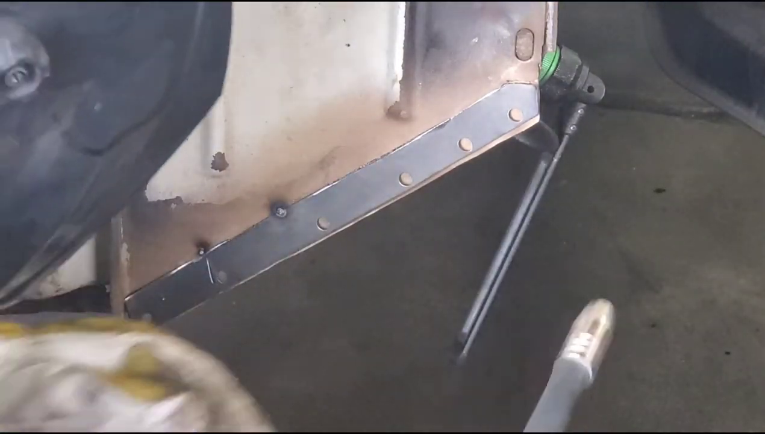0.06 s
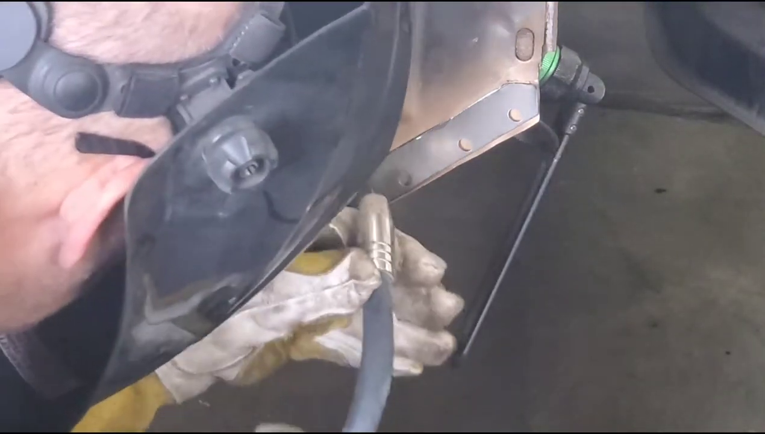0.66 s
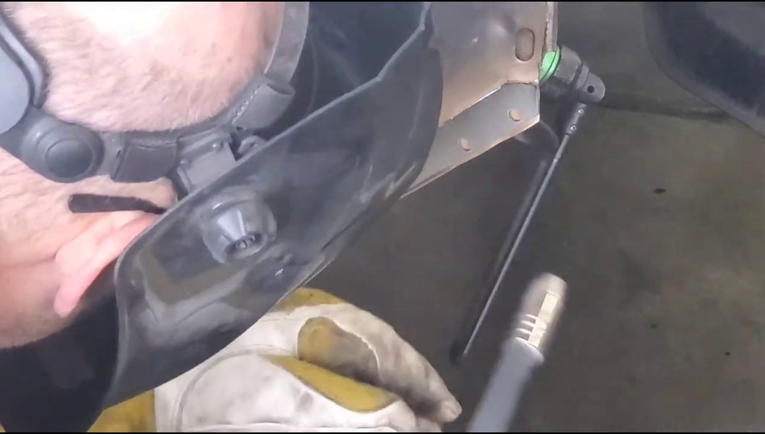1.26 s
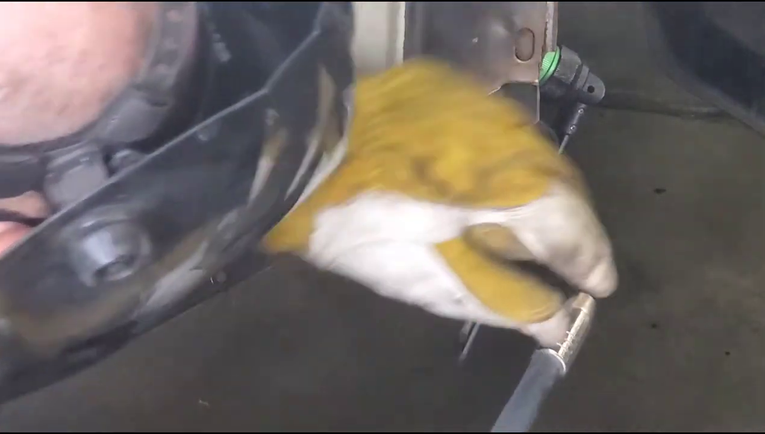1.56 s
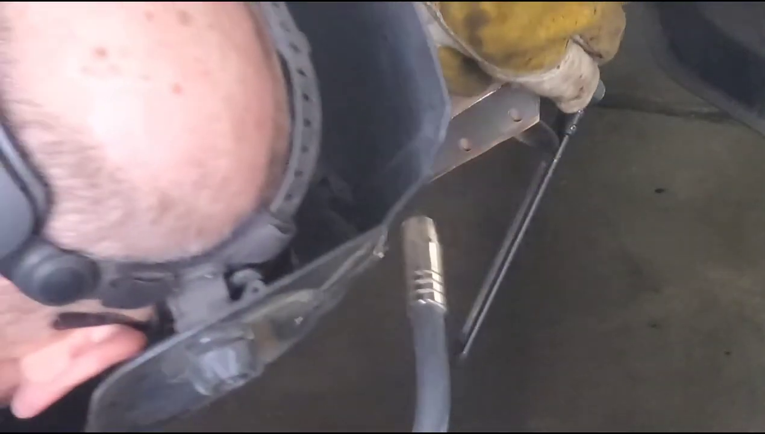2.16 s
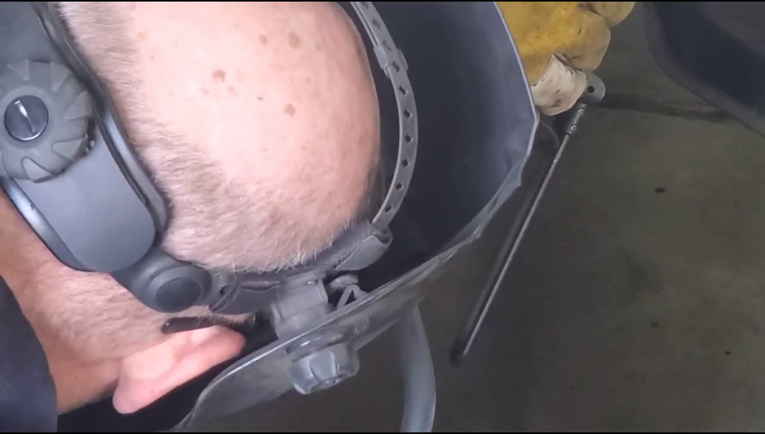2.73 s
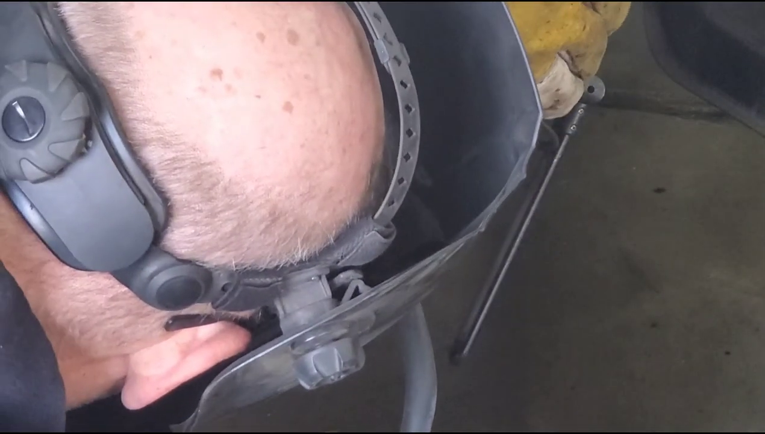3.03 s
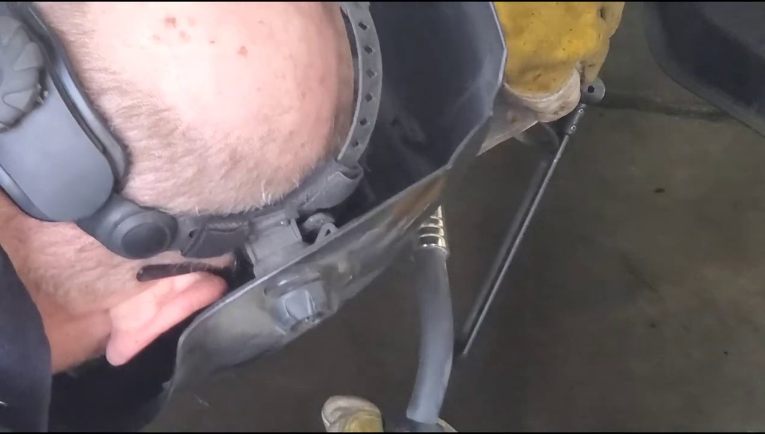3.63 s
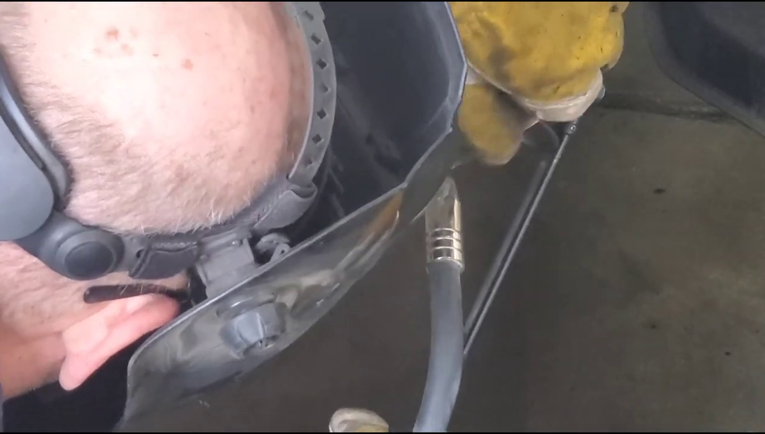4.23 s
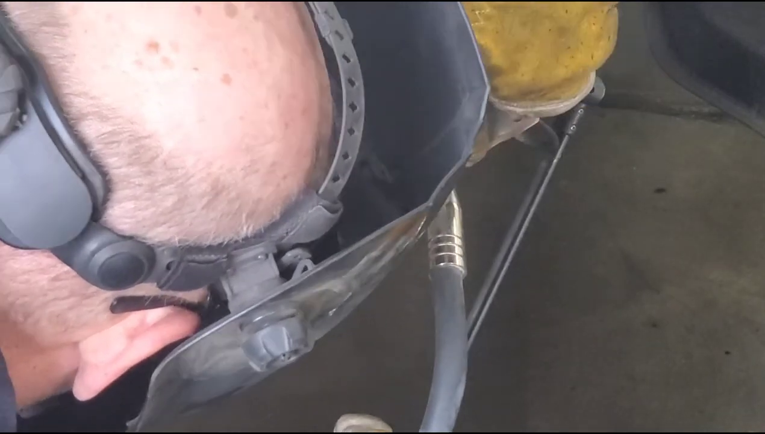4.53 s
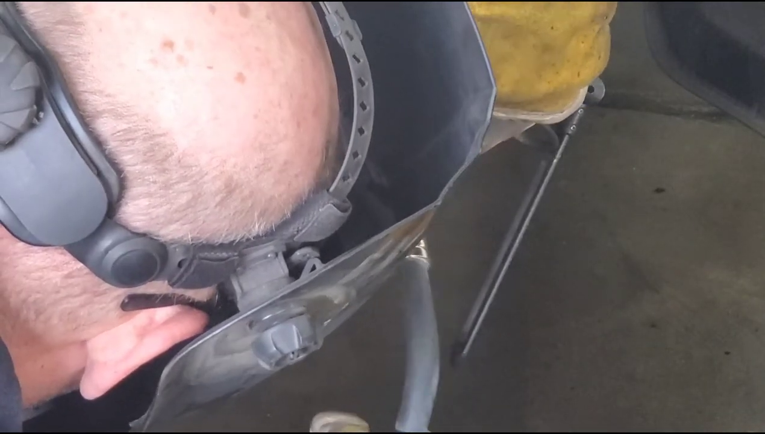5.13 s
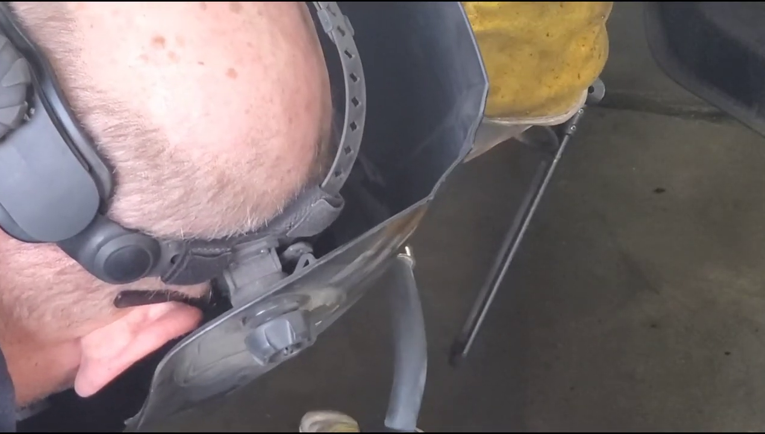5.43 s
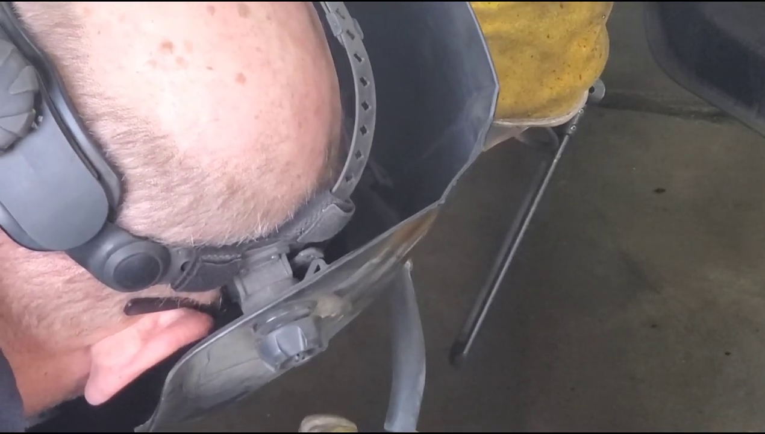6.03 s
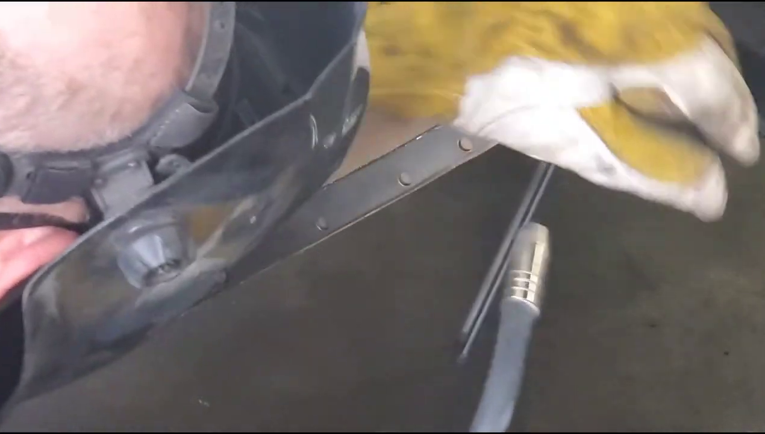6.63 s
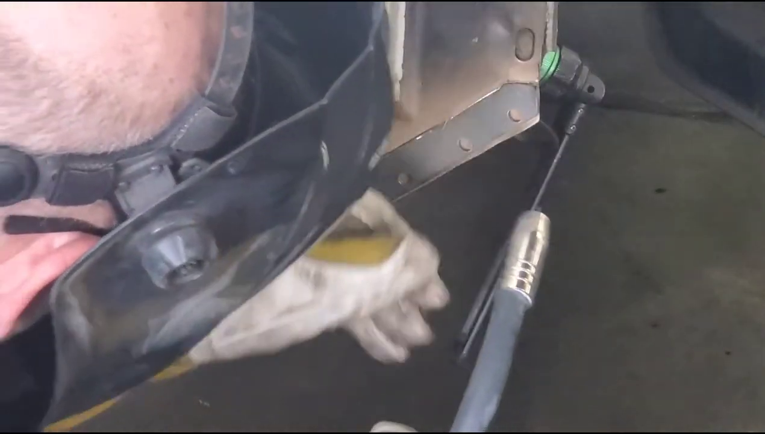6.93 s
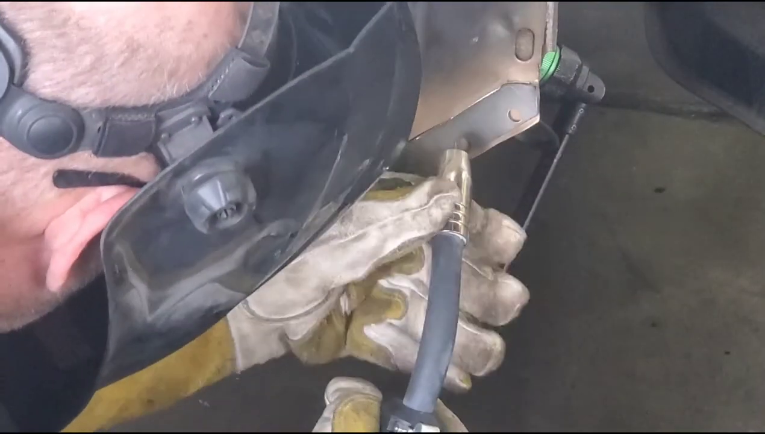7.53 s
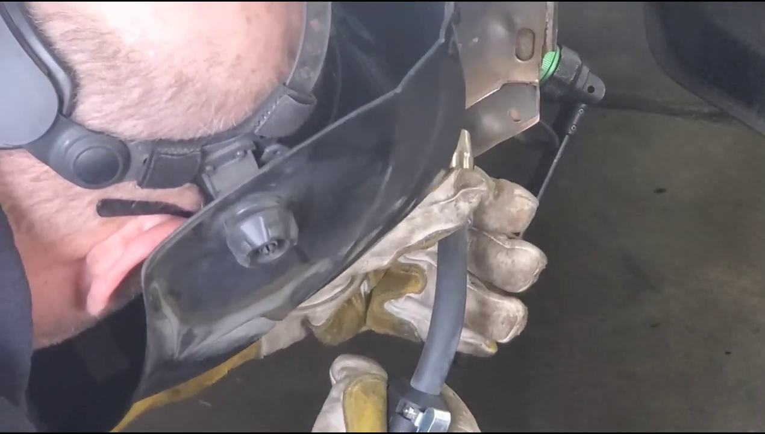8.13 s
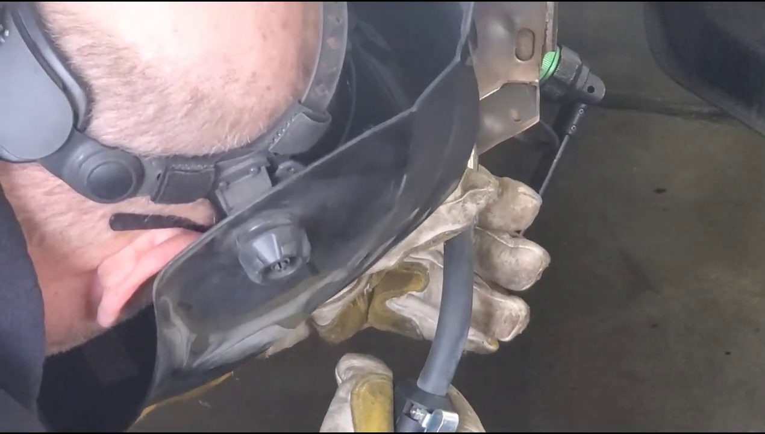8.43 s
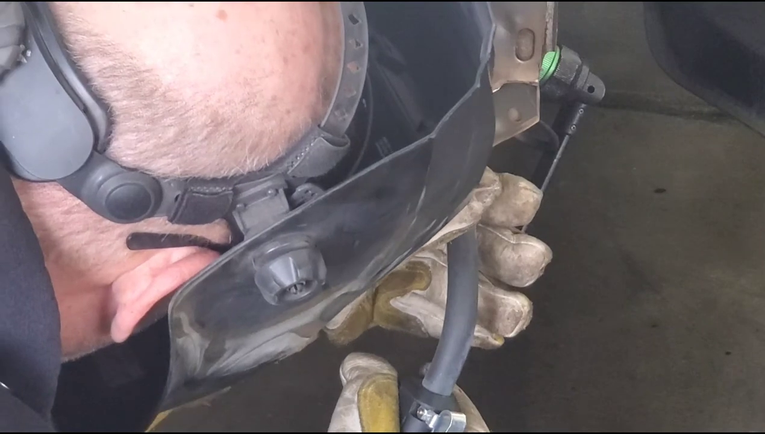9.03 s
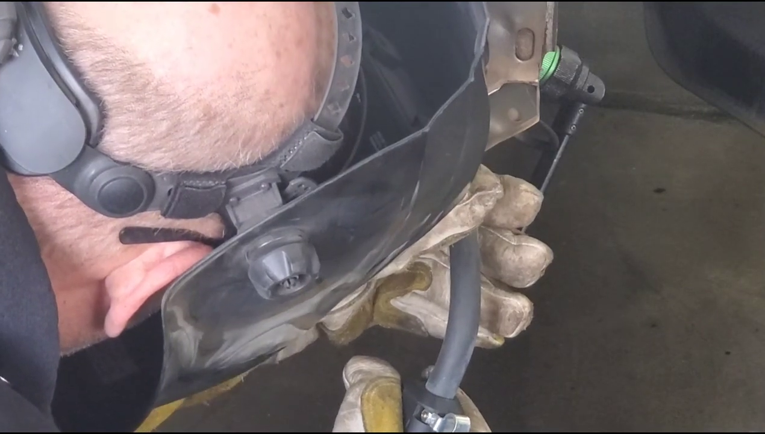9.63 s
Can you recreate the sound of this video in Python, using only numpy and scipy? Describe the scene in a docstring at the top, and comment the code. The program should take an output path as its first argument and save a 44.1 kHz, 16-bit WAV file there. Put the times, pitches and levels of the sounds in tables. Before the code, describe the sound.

A welding machine idles throughout in a slightly reverberant workshop: fans rush and hum over a soft electrical buzz. Underneath, a faint, distant engine throbs, rising twice and running down. Close by, a leather glove brushes steel, with a few light ticks around 0.3 to 0.5 seconds. A sharper tick comes at 3.1 seconds, another at 3.7, then a soft shuffle near 4. At about 6.7 seconds there is a tap and a quick glove scuff, after which the hum continues almost alone. At 9.5 seconds gas hisses softly from the torch and the wire feed whirrs for an instant. At 9.7 seconds the welding arc strikes with a sharp bang, by far the loudest sound, breaking straight into rapid, bright snaps and a spitting sizzle that last until the end, just before 10 seconds.

```python
"""Striking a MIG arc

A welder idles in a workshop: two cooling fans hum and rush, its transformer buzzes and an engine
drones far away. Gloves and torch brush and tick on a steel panel. The trigger opens the gas and starts
the wire feed; the arc strikes with a bang and crackles, and a gain control ducks the hum under it."""
import sys
import numpy as np
from scipy import signal
from scipy.fft import rfft, irfft, next_fast_len
from scipy.io import wavfile
from scipy.ndimage import uniform_filter1d, minimum_filter1d, map_coordinates

SR = 44100
rng = np.random.default_rng(int(sys.argv[2]) if len(sys.argv) > 2 else 0)


def materialize(psi):
    """Save the field psi as 16-bit PCM at rate SR to the path in sys.argv[1].

    A 1-D psi becomes a single channel; in a 2-D psi each row is a channel.
    """
    bounded = np.clip(np.atleast_2d(psi).T, -1, 1)
    quanta = np.round(bounded * 32767).astype(np.int16)
    wavfile.write(sys.argv[1], SR, quanta)


N = 436149
TIME = np.arange(N) / SR


# Bursts of the wire tip. Each row: start in seconds, level in dB.
TIP_BURSTS = [(9.6832, 9), (9.686, -0.5), (9.6946, -5), (9.7025, -5)]
# Spectrum of a burst. Each row: frequency in Hz, level in dB.
BANG_SPECTRUM = [(30, -42), (100, -24), (300, -2.5), (700, -0.5), (1600, 3), (2150, -1), (2700, 4.5),
                 (3900, -6), (6000, -12), (8500, -27), (11200, -11.5), (16000, -32)]

def bang():
    """Impulsive radiation: the wire tip blows off and sputters."""
    return cracks(TIP_BURSTS, BANG_SPECTRUM, near_db=-11, near_t60=0.0057, far_db=-29.5, far_t60=0.07)


# The loudest snaps. Each row: start in seconds, relative level in dB.
SNAP_EVENTS = [(9.6975, 4), (9.7083, -3), (9.7186, -8), (9.7293, 6), (9.7364, 0), (9.7418, -3), (9.7509, 2),
               (9.7585, -2), (9.7678, 2), (9.7777, 6.5), (9.7875, 6), (9.7994, 2), (9.8123, 6), (9.8362, 0),
               (9.8405, -4), (9.847, 3), (9.8582, 4), (9.8698, 2), (9.8831, 3.5)]
# Spectrum of a snap. Each row: frequency in Hz, level in dB.
SNAP_SPECTRUM = [(100, -27), (400, -14), (1800, -5), (3100, 2), (6200, -2.5), (7300, -7), (9200, -1),
                 (10400, 5.5), (11300, 8.5), (12400, 3), (14300, -6), (15500, -9.5)]

def snaps():
    """Short-circuit transfer: the wire shorts in the pool and the arc relights with a pressure pulse."""
    pulses = cracks(SNAP_EVENTS, SNAP_SPECTRUM, near_db=-6, near_t60=0.003, far_db=-40, far_t60=0.047)
    return amp(1) * pulses


# Envelope of the sizzle. Each row: time in seconds, relative level in dB.
SIZZLE_ENVELOPE = [(9.69, -22.5), (9.712, -23), (9.724, -23.5), (9.745, -22), (9.765, -21.5),
                   (9.783, -26.5), (9.82, -23.5), (9.84, -21.5), (9.865, -21.5), (9.89, -25)]
# Its spectrum. Each row: frequency in Hz, level in dB.
SIZZLE_SPECTRUM = [(100, -12), (400, -7), (1500, -4.5), (2200, -1.5), (3100, 1), (6500, 0), (8000, -2.5),
                   (9200, -5), (11200, -0.5), (14000, -6), (16000, -7.5)]
# The steel panel's broad colour. Each row: centre in Hz, width in Hz, gain in dB.
PANEL_COLOUR = [(980, 160, -2.5), (1580, 250, 2.5), (1900, 250, -4.5), (2530, 190, -6.5), (2920, 160, 1.5),
                (7100, 520, 2.5)]
# Narrow peaks that colour the sizzle. Each row: centre in Hz, width in Hz, gain in dB.
SIZZLE_PEAKS = [(3270, 70, 6), (4070, 110, 0), (4680, 70, 5.5), (5235, 45, 0), (6360, 65, 9), (6955, 45, 9),
                (11390, 70, 5), (11900, 70, 5)]

def sizzle():
    """Amplitude modulation: arc noise, made uneven by spatter, with a few narrow ringing peaks."""
    spit = unit(amp(2.6 * wobble(600)))
    hiss = noise(SIZZLE_SPECTRUM, coherence=[(1000, 1.0), (8000, 0.11)])
    ringing = filtered(hiss, lambda hz: bumps(PANEL_COLOUR, hz) * bumps(SIZZLE_PEAKS, hz))
    burning = TIME > TIP_BURSTS[0][0]
    return amp(curve(SIZZLE_ENVELOPE) + 6.5) * burning * spit * ringing


# Spectrum of a droplet's pop. Each row: frequency in Hz, level in dB.
DROPLET_SPECTRUM = [(200, -17), (1500, -5), (2200, -7), (3200, 0), (4200, 0), (7000, -6), (16000, -20)]

def spatter(level_db, spread_db, count):
    """Shot noise: droplets leave the pool at random moments, louder when the sizzle is."""
    when, weakness = rng.random((count, 2)).T
    strike = TIP_BURSTS[0][0]
    starts = strike + when * (TIME[-1] - strike)
    db = np.interp(starts, *np.transpose(SIZZLE_ENVELOPE)) + level_db - spread_db * weakness
    return cracks(zip(starts, db), DROPLET_SPECTRUM, near_db=-16, near_t60=0.004,
                  far_db=-36, far_t60=0.04)


# Balance of the crackle. Each row: frequency in Hz, left minus right in dB.
CRACKLE_PAN = [(1000, 1.5), (3000, -2), (4800, 4), (6500, 1), (7500, -5), (9500, -1), (11500, -10),
               (15000, -4)]

def arc():
    """Superposition: the opening bang, then a crackle of snaps, sizzle and droplets."""
    strike = bang()
    crackle = snaps() + sizzle() + spatter(level_db=21.5, spread_db=14, count=32)
    return strike + filtered(crackle, lambda hz: pan(along(CRACKLE_PAN, hz)))


# The valve's surge, then steady flow. Each row: time in seconds, level in dB.
GAS_ENVELOPE = [(9.541, -88), (9.545, -34), (9.548, -31.5), (9.56, -38), (9.6, -41), (9.68, -49.5),
                (9.89, -52)]
# Spectrum of the jet. Each row: frequency in Hz, level in dB.
NOZZLE_SPECTRUM = [(600, -31), (1330, -14), (1530, 5.5), (1800, -1), (2800, -3.5), (5400, -13),
                   (6700, -1.5), (7600, -15), (9300, -12), (10400, 0), (12600, -2.5), (13600, -7),
                   (15800, -10)]

def gas():
    """Jet noise: shielding gas hisses from the nozzle."""
    valve_open = TIME > GAS_ENVELOPE[0][0]
    jet = noise(NOZZLE_SPECTRUM, coherence=[(1000, 0.2)])
    return amp(curve(GAS_ENVELOPE)) * valve_open * jet * pan(-0.74)


# The feed starting up. Each row: start in seconds, length in seconds, level in dB.
FEED_START = [(9.54, 0.099, -41.5)]
# Spectrum of its whirr. Each row: frequency in Hz, level in dB.
FEED_SPECTRUM = [(60, -42), (150, -14), (310, -9), (360, 4), (440, 1), (520, -5), (800, -24), (2000, -66)]

def wire_feed():
    """Narrow-band noise: the motor whirrs as it pushes the wire out."""
    return strokes(FEED_START, FEED_SPECTRUM, grain_db=2.5)


# Torch and helmet touches. Each row: start in seconds, level in dB, tilt in dB per octave.
TOUCHES = [(0.3058, -35, 3), (0.366, -29.5, -0.5), (0.41, -29, -0.5), (0.5314, -26, -1),
           (3.1024, -22.5, -0.3), (3.653, -27, 2), (3.7007, -39, 4), (6.6926, -23.5, -3), (6.8697, -36, 0)]
# Leather brushing steel, light hissing slides and a soft shuffle.
# Each row: start in seconds, length in seconds, level in dB.
BRUSH_STROKES = [(0.22, 0.31, -52), (1.36, 0.18, -56), (2.85, 0.3, -55), (3.65, .09, -59),
                 (6.1, .55, -53.5), (6.66, 0.073, -39), (6.708, 0.073, -40.5), (6.76, 0.18, -52)]
SLIDE_STROKES = [(4.66, .1, -67.5), (5.07, 0.085, -64), (8.47, 0.082, -68.5)]
SHUFFLE_STROKES = [(3.885, 0.061, -42), (3.9, 0.18, -45)]
# Spectra of these four contacts. Each row: frequency in Hz, level in dB.
TOUCH_SPECTRUM = [(100, -28), (500, -15), (1200, -2), (3000, 2.5), (4500, -4.5), (6900, -5), (8500, -24),
                  (12000, -27), (16000, -39)]
BRUSH_SPECTRUM = [(60, -26), (250, 3), (700, 7), (1300, 5), (2000, 0), (3300, 1), (6800, -7), (8500, -21),
                  (11500, -17.5), (16000, -31)]
SLIDE_SPECTRUM = [(5000, -26), (9500, -6), (12000, 0), (16000, -17.5)]
SHUFFLE_SPECTRUM = [(60, -25), (170, -3), (330, 2), (480, 3), (620, -7), (1200, -15), (3000, -38),
                    (8000, -90)]

def handling():
    """Impact and friction: gloves, helmet and torch are brought into place."""
    ticks = sum(cracks([(start, db)], tilted(TOUCH_SPECTRUM, tilt),
                       near_db=-6.5, near_t60=0.0052, far_db=-28, far_t60=0.08)
                for start, db, tilt in TOUCHES)
    slides = strokes(SLIDE_STROKES, SLIDE_SPECTRUM, grain_db=2)
    brushes = strokes(BRUSH_STROKES, BRUSH_SPECTRUM, grain_db=2.4)
    shuffle = strokes(SHUFFLE_STROKES, SHUFFLE_SPECTRUM, grain_db=1.5)
    return ticks + slides + brushes + shuffle


MAINS_HZ, FAN_HZ, SMALL_FAN_HZ = 60, 284.8, 498.4
# Partials of the fans and the transformer. Each row: harmonic number, rms level in dB,
# left minus right in dB, left phase lead in radians, flutter depth as a ratio.
FAN_PARTIALS = [(1, -43, -2, 0.37, 0.01), (2, -52.5, 1, 1.23, 0.02), (3, -47, -3, -0.37, 0.05),
                (4, -65.5, -2, -0.43, 0.8)]
SMALL_FAN_PARTIALS = [(1, -55, 1, -0.69, 0.28), (2, -59, 7.5, -2.1, 0.29), (3, -58, -2.5, 2.08, 0.39),
                      (4, -58.5, 8.5, -1.84, 0.43), (5, -73, 3, -0.5, 0.26)]
MAINS_PARTIALS = [(4, -56, 0.3, 0.48, 0.15), (11, -62, 3, 0, 2.1), (13, -64, 3, 0, 0.87)]

def hum():
    """Harmonic series: blade-passing tones of two fans and the transformer's mains buzz."""
    fans = tones(FAN_HZ, FAN_PARTIALS) + tones(SMALL_FAN_HZ, SMALL_FAN_PARTIALS)
    return fans + tones(MAINS_HZ, MAINS_PARTIALS)


FAN_LEAD_S, DIFFUSE_BASS_HZ = 0.00039, 330  # the rush arrives left first; bass comes from all round
# Spectrum of fan rush and room. Each row: frequency in Hz, relative level in dB.
AIR_SPECTRUM = [(15, -52), (25, -18), (59, -8), (120, -12), (195, -10.5), (222, -15.5), (285, -6.5),
                (373, -14.5), (560, -12.5), (714, -13.5), (863, -13.5), (936, -14.5), (1290, -20),
                (2000, -16), (6380, -29.5), (11300, -52.5), (16000, -54)]
# Likeness of the two sides. Each row: frequency in Hz, coherence from 0 to 1.
AIR_COHERENCE = [(60, 0.96), (130, 0.96), (290, 0.87), (600, 0.54), (900, 0.34), (1400, 0.41), (3100, 0.31),
                 (5500, 0.17), (7500, 0.072)]
# Colour of the housing. Each row: centre in Hz, width in Hz, gain in dB.
HOUSING_COLOUR = [(1040, 140, 4.5), (1370, 470, 2), (1720, 390, 0.5), (2580, 380, 3.5), (2850, 130, -2),
                  (2990, 120, 3.5), (3590, 470, 4), (3930, 3800, 0.8), (4600, 340, 3), (5250, 400, -3),
                  (6650, 620, 3.5), (8270, 1100, -3.5), (11350, 1970, 10)]
# Balance of the rush. Each row: frequency in Hz, left minus right in dB.
RUSH_PAN = [(200, 0), (1000, 3), (2000, 3.5), (3200, -0.5), (4800, 8), (6500, 5), (7400, -10), (8200, 2),
            (9300, 6), (10300, -0.5)]

def fan_air():
    """Flow noise: air rushes through the resonant housing, chopped lightly at each turn of the fan."""
    def response(hz):
        lead_s = FAN_LEAD_S * hz ** 2 / (hz ** 2 + DIFFUSE_BASS_HZ ** 2)
        direction = pan(along(RUSH_PAN, hz)) * phase_lead(2 * np.pi * hz * lead_s)
        return bumps(HOUSING_COLOUR, hz) * direction * ripple(hz, depth_db=1.8, spacing_hz=40.2)

    air = unit(filtered(noise(AIR_SPECTRUM, AIR_COHERENCE), response))
    chop = 1 + 0.055 * np.sin(2 * np.pi * FAN_HZ / 4 * TIME)  # four blades to a turn
    return amp(-43.5 + 0.05 * wobble(1.5) + 0.18 * wobble(15)) * chop * air


ECHO_SHARE, FADES_PER_S = 0.13, 9  # reflected against direct sound; how fast their sum varies
RUMBLE_DB, RUMBLE_DB_PER_HZ = -56.5, 0.29  # at the mean speed; growth with the firing rate
# The engine pulls up twice and runs down. Each row: time in seconds, firing rate in Hz.
FIRING_RATE = [(0.0, 56), (0.91, 59.6), (0.96, 63), (1.63, 70.7), (2.03, 72.0), (2.27, 61.3), (2.57, 61.1),
               (4.36, 71.1), (5.26, 68.6), (5.43, 58.1), (5.56, 56.0), (6.84, 55.5), (7.46, 57.1),
               (8.72, 57.2), (8.9, 50.4), (9.6, 51.3)]
# Envelope of its tone. Each row: time in seconds, relative level in dB.
FIRING_ENVELOPE = [(0.0, -57), (0.24, -59), (1.49, -45), (1.82, -56), (1.9, -40), (2.03, -57), (2.57, -40),
                   (2.81, -48), (2.94, -40), (3.05, -52), (3.15, -39), (3.31, -52), (4.17, -40.5),
                   (4.22, -48), (4.3, -38), (4.44, -44), (4.49, -37), (5.13, -47.5), (5.53, -37),
                   (5.72, -41), (5.86, -54), (6.12, -41), (6.26, -51), (6.39, -38), (6.55, -36),
                   (6.68, -42), (6.74, -58), (6.9, -41.5), (7.35, -42.5), (7.99, -56.5), (8.1, -48),
                   (8.5, -56), (8.56, -67), (8.61, -48), (8.74, -71), (8.8, -60), (9.09, -46), (9.33, -62),
                   (9.52, -49), (9.6, -56)]

def engine():
    """Multipath interference: a distant firing tone throbs over a rumble that grows with speed."""
    hz = curve(FIRING_RATE)
    phase = 2 * np.pi * np.cumsum(hz) / SR
    firing = np.exp(1j * phase) + amp(-20) * np.exp(2j * phase)  # with a trace of its octave
    paths = unit(1 + ECHO_SHARE * (wobble(FADES_PER_S) + 1j * wobble(FADES_PER_S)))
    tone = amp(curve(FIRING_ENVELOPE) - 0.5) * np.sqrt(2) * np.real(paths * firing)
    return tone + rumble(hz)


# Spectrum of the engine's rumble. Each row: frequency in Hz, level in dB.
RUMBLE_SPECTRUM = [(30, -28), (80, 1.5), (130, -4), (170, -5), (260, -23), (1000, -90)]

def rumble(firing_hz):
    """Transmission through walls: the low part of the engine's noise comes through."""
    db = RUMBLE_DB + RUMBLE_DB_PER_HZ * (firing_hz - firing_hz.mean())
    return amp(db) * noise(RUMBLE_SPECTRUM, coherence=[(100, 0.9)])


# Faint drones. Each row: start in seconds, length in seconds, frequency in Hz, level in dB.
DRONE_NOTES = [(0.0, 0.55, 159, -54), (2.6, 0.45, 125, -52), (7.55, 0.45, 147, -52), (2, 3.8, 157, -60),
               (6, 2.2, 173, -60)]

def drones():
    """Slow modulation: low notes swell, waver and fade in the hall."""
    waver = np.cumsum(0.0066 * wobble(8)) / SR
    return np.sqrt(2) * sum(amp(db) * swell(start, length) * np.sin(2 * np.pi * hz * (TIME + waver))
                            for start, length, hz, db in DRONE_NOTES)


# Decay of the hall. Each row: frequency in Hz, time to fall 60 dB in seconds.
HALL_T60 = [(150, 0.53), (2000, 0.43), (12000, 0.49)]

def workshop(x):
    """Reverberation: a diffuse tail decays exponentially, the bass lasting longest."""
    hz, t, bands = signal.stft(rng.standard_normal((2, SR // 2)), SR, nperseg=256)
    decay = amp(-60 * t / along(HALL_T60, hz)[:, None])
    tail = signal.istft(bands * decay, SR, nperseg=256)[1]
    return signal.fftconvolve(x, tail / np.linalg.norm(tail[0]), axes=1)[:, :N]


def cracks(rows, spectrum, near_db, near_t60, far_db, far_t60):
    """Scattering: each pulse rebounds from the panel close by and from helmet and floor further off."""
    out = np.zeros((2, N + SR))
    t = np.arange(SR // 8) / SR
    scatter = amp(near_db - 60 * t / near_t60) + amp(far_db - 60 * t / far_t60)
    scatter *= 1 - np.exp(-(t / 0.00045) ** 2)  # the direct pulse arrives alone
    shape = pulse(spectrum)[None]
    for start, db in rows:
        paths = scatter * rng.standard_normal((2, len(t)))
        paths[:, 0] = 1
        first = round(start * SR)
        out[:, first:first + len(t)] += amp(db) * signal.fftconvolve(paths, shape, axes=1)[:, :len(t)]
    return out[:, :N]


def pulse(spectrum, size=1024):
    """Minimum phase: the sharpest causal pulse with this spectrum and the panel's colour, peak 1."""
    hz = np.fft.rfftfreq(size, 1 / SR)
    cepstrum = irfft(np.log(amp(along(spectrum, hz)) * bumps(PANEL_COLOUR, hz)))
    cepstrum[1:size // 2] *= 2
    cepstrum[size // 2 + 1:] = 0
    shape = irfft(np.exp(rfft(cepstrum)))
    return shape / np.abs(shape).max()


def strokes(rows, spectrum, grain_db):
    """Friction noise: it swells and fades with each movement, grainy where the surfaces catch."""
    level = sum(amp(db) * swell(start, length) for start, length, db in rows)
    grain = unit(amp(grain_db * wobble(300)))
    return level * grain * noise(spectrum, coherence=[(1000, 0.57)])


def tones(base_hz, rows):
    """Random modulation: harmonics share one slightly drifting rate; turbulence makes each flutter."""
    out = np.zeros((2, N))
    drift = np.cumsum(0.000609 * wobble(3)) / SR
    for order, db, balance_db, lead, flutter in rows:
        swirl = 1 + flutter * (wobble(14) + 1j * wobble(14)) / np.sqrt(2)
        cycles = order * base_hz * (TIME + drift) + rng.random()
        tone = amp(db) * np.sqrt(2) * unit(swirl) * np.exp(2j * np.pi * cycles)
        out += np.real(tone * pan(balance_db) * phase_lead(lead))
    return out


def noise(spectrum, coherence):
    """Partial coherence: independent mid and side noises mix to coloured stereo noise of rms 1."""
    def response(hz):
        angle = np.arccos(np.clip(along(coherence, hz), -1, 1)) / 2
        return amp(along(spectrum, hz)) * [np.cos(angle), np.sin(angle)]

    mid, side = filtered(rng.standard_normal((2, N)), response)
    return unit(np.array([mid + side, mid - side]))


def bumps(rows, hz):
    """Spectral colouring: a gain made of bell-shaped peaks and dips."""
    return amp(sum(db * np.exp(-2 * ((hz - centre) / width) ** 2) for centre, width, db in rows))


def ripple(hz, depth_db, spacing_hz):
    """Interference: reflections leave fine, steady peaks and dips on each side."""
    knots = rng.standard_normal((2, 1024))
    return amp(depth_db * np.array([np.interp(hz / spacing_hz, np.arange(len(k)), k) for k in knots]))


def tilted(spectrum, db_per_octave):
    """Spectral tilt: a slope brightens or dulls the sound."""
    return [(hz, db + db_per_octave * np.log2(hz / spectrum[0][0])) for hz, db in spectrum]


def filtered(x, response):
    """Linear filtering: the spectrum of x times a frequency response."""
    size = next_fast_len(N + SR // 4)
    return irfft(rfft(x, size) * response(np.fft.rfftfreq(size, 1 / SR)), size)[..., :N]


def pan(balance_db):
    """Level difference: left and right gains."""
    return amp(np.array([[0.5], [-0.5]]) * balance_db)


def phase_lead(radians):
    """Phase difference: left and right phasors."""
    return np.exp(1j * radians * np.array([[0.5], [-0.5]]))


def swell(start, length):
    """Half-sine envelope: a soft rise and fall."""
    return np.sin(np.pi * np.clip((TIME - start) / length, 0, 1))


def wobble(rate):
    """Smooth random curve with rate knots a second."""
    coarse = TIME[::64]
    knots = rng.standard_normal(int(N * rate / SR) + 4)
    return np.interp(TIME, coarse, map_coordinates(knots, [coarse * rate]))


def curve(points):
    """Linear interpolation of (seconds, value) points at every sample."""
    return np.interp(TIME, *np.transpose(points))


def along(points, hz):
    """Interpolation of (Hz, value) points on a log axis."""
    knots_hz, values = np.transpose(points)
    return np.interp(np.log(hz + 1), np.log(knots_hz + 1), values)


def amp(db):
    """Decibels to gain."""
    return 10 ** (np.asarray(db) / 20)


def unit(x):
    """Normalisation to rms 1."""
    return x / np.sqrt(np.mean(np.abs(x) ** 2) + 1e-20)


def scene():
    """Superposition: the weld and the handling reverberate over the machine and the distant drones."""
    work = arc() + gas() + wire_feed() + handling()
    return work + amp(-5) * workshop(work) + hum() + fan_air() + engine() + drones()


def gain_control(x, ceiling_db, recovery_db_per_s):
    """Peak limiting: a peak over the ceiling pulls the gain down at once; it comes back slowly."""
    over_db = np.maximum(20 * np.log10(np.abs(x).max(axis=0) + 1e-9) - ceiling_db, 0)
    recovery_db = recovery_db_per_s * TIME
    cut_db = np.maximum.accumulate(over_db + recovery_db) - recovery_db
    return x * uniform_filter1d(minimum_filter1d(amp(-cut_db), size=33), size=33)


def record(dry):
    """Gain control and band limiting; the sound eases in over 3 ms."""
    held = gain_control(dry, ceiling_db=-1.5, recovery_db_per_s=0.5)
    eased = held * np.minimum(TIME / 0.003, 1)
    lowpass = signal.cheby1(12, 0.05, 15850, fs=SR, output="sos")
    return signal.sosfiltfilt(lowpass, eased, padtype="even")


dry = scene()
out = record(dry)
materialize(out)
```